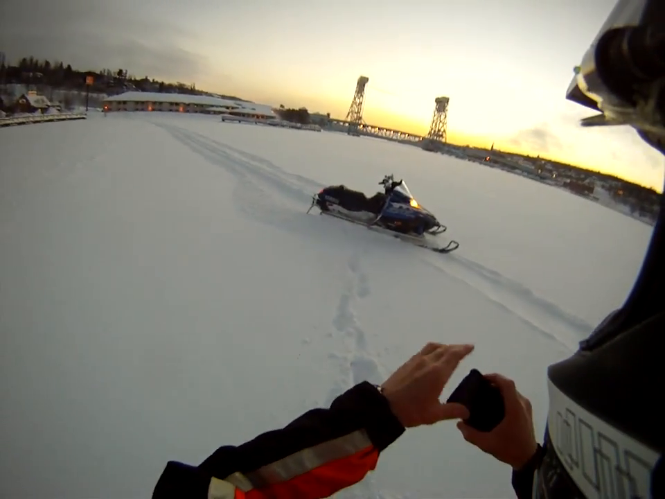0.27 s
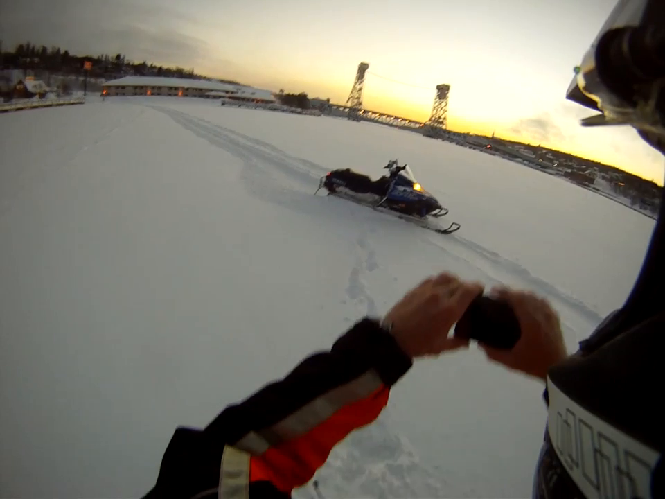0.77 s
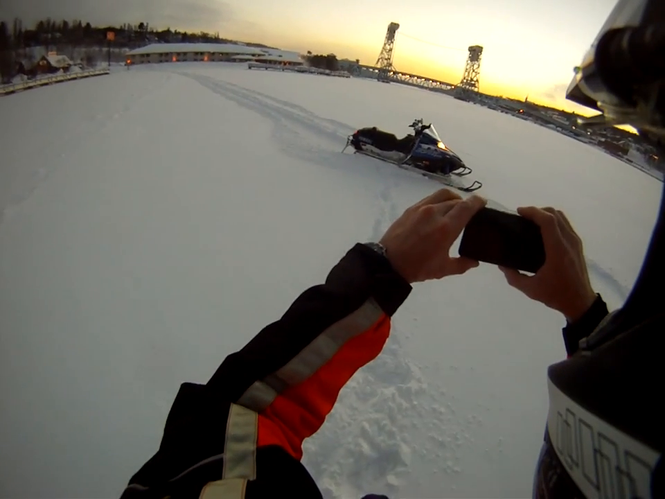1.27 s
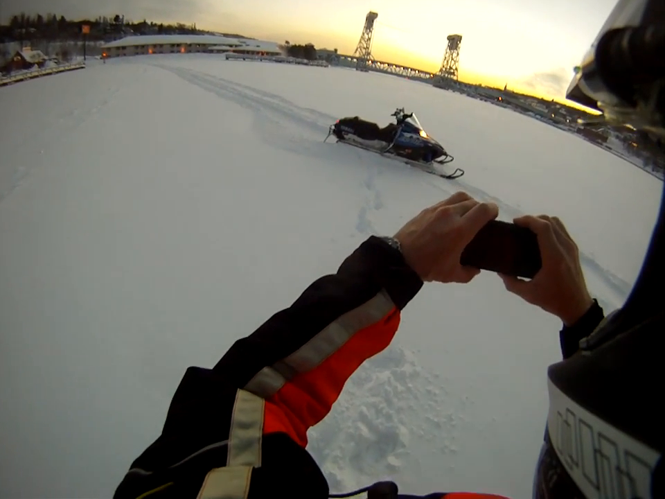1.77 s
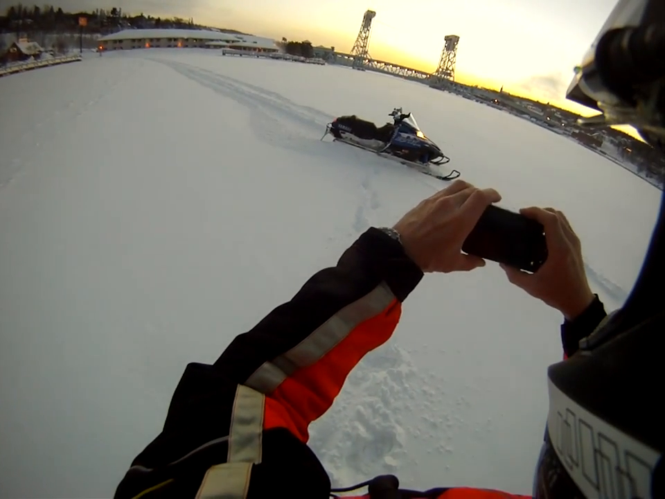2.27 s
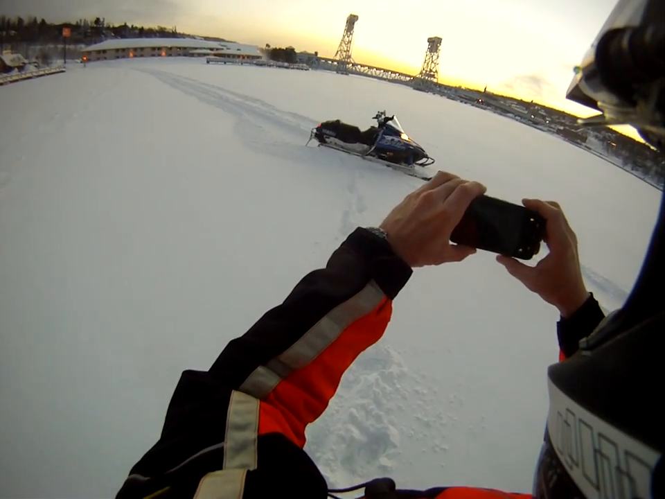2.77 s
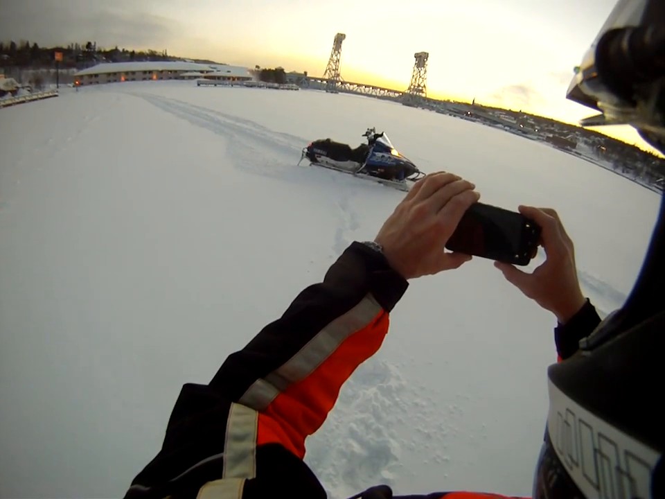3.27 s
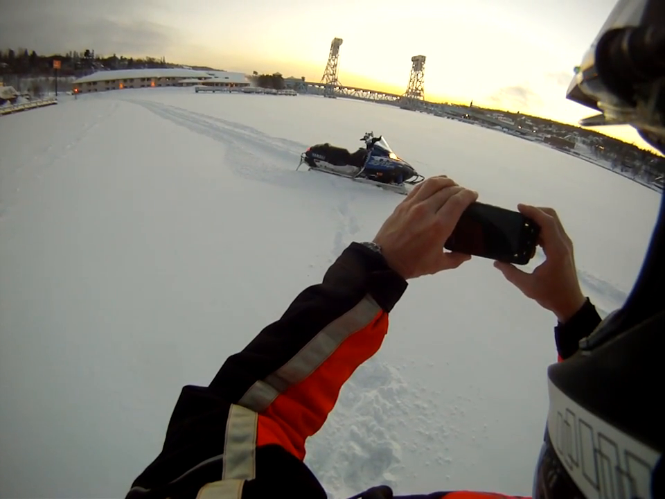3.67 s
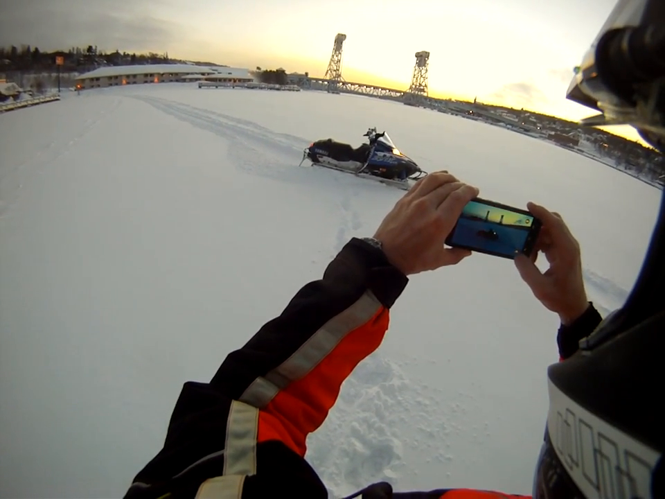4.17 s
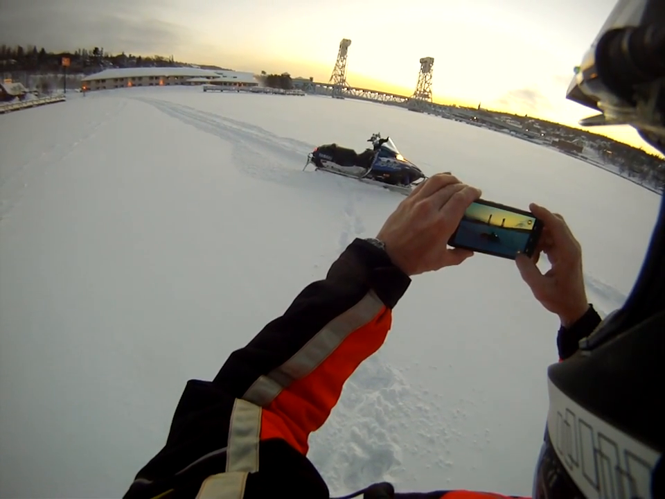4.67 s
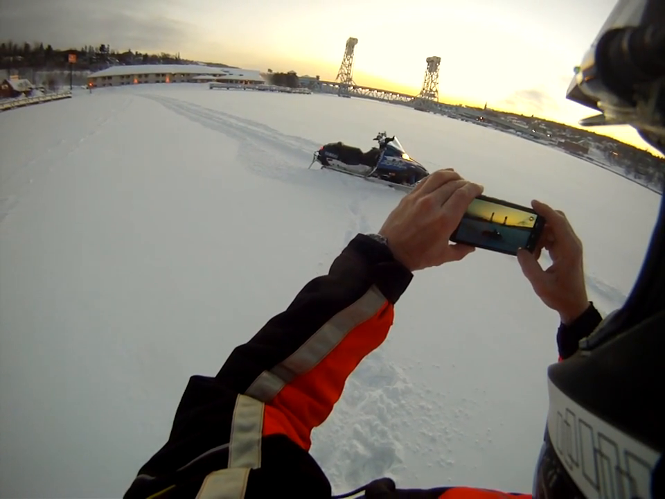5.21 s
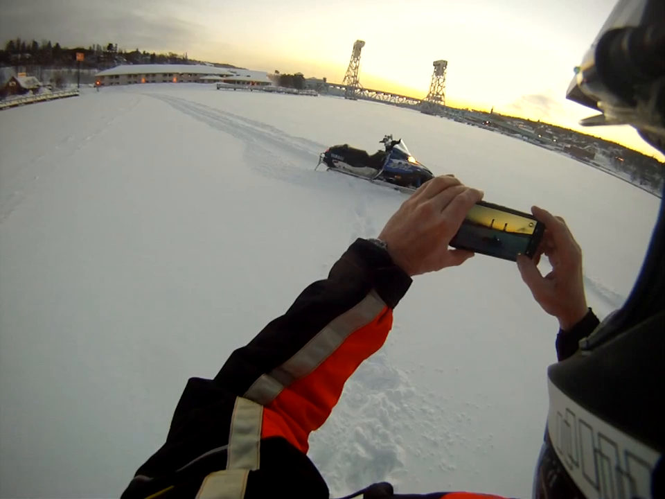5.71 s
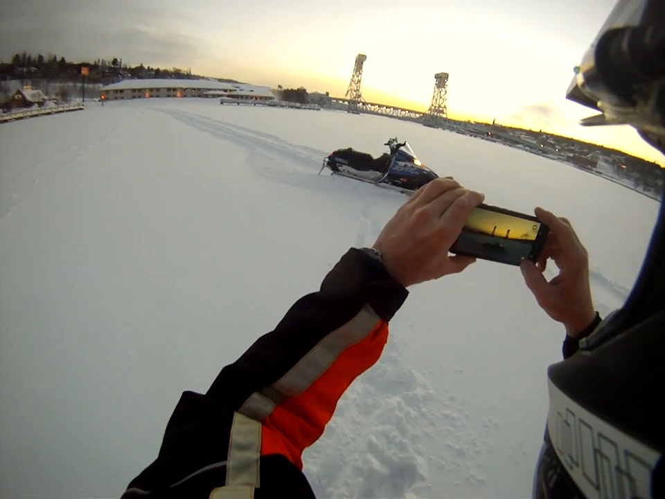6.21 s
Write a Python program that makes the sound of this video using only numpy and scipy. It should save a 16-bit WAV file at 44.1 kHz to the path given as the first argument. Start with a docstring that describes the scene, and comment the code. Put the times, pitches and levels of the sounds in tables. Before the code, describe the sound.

Muffled, uneven snowmobile idle heard from inside a sealed camera housing, with loud early clicks and knocks, soft low thumps, and one late sharp knock.

```python
"""A two-stroke snowmobile idles on open snow, heard by a camera sealed in a housing on a helmet.
Throughout, harmonics of the exhaust note lope over filtered-noise wash and clatter, with body rumble below.
In the first two seconds decaying modes make mount knocks and strap snaps, and grains of noise make cloth
rustle and creaks; knocks and rustle return near 6 s. Low thumps, damped sine pushes, recur all along.
The recorder holds each sample at a low rate, which mirrors the sound into the treble."""
import sys
import numpy as np
from scipy import signal
from scipy.fft import rfft, irfft
from scipy.io import wavfile

SR = 44100
rng = np.random.default_rng(int(sys.argv[2]) if len(sys.argv) > 2 else 0)


def wav_record(signal):
    """Record a signal, one row per channel, as 16-bit PCM in the file named by sys.argv[1]."""
    frames = np.transpose(np.atleast_2d(signal))
    bounded = np.clip(frames, -1, 1)
    # unit amplitude maps onto the largest positive 16-bit level
    quanta = np.round(bounded * 32767).astype(np.int16)
    wavfile.write(sys.argv[1], SR, quanta)


N = 284441
T = np.arange(N) / SR

# Modes of the mount's shell. Each row: frequency in Hz, relative level in dB, t60 in seconds.
SHELL = [(331, -10.5, 0.015), (850, -16.5, 0.036), (1292, 2.5, 0.018), (1770, 2, 0.013), (1890, -1, .015),
         (2230, -8, 0.011), (2550, -8.5, 0.012), (3377, -17, 0.016), (4340, -46.5, 0.018),
         (5210, -22, 0.0083)]


def gain_of(db):
    """A level in decibels is twenty times the logarithm of an amplitude ratio."""
    return 10 ** (np.asarray(db) / 20)


def evened(x):
    """Dividing by the root mean square gives a signal unit rms."""
    return x / np.sqrt(np.mean(x ** 2) + 1e-20)


def read(points, hz):
    """A spectrum is interpolated in level along a logarithmic frequency axis."""
    f, value = np.transpose(points)
    return np.interp(np.log(hz + 1), np.log(f + 1), value)


def add(mix, s, sound):
    """Superposition: a sound starting at second s is summed into the mix in place."""
    part = mix[round(s * SR):][:len(sound)]
    part += sound[:len(part)]


def coloured(x, db_of):
    """Linear filtering multiplies the spectrum by a gain, given in dB as a function of frequency."""
    frequencies = np.fft.rfftfreq(N, 1 / SR)
    return irfft(rfft(x) * gain_of(db_of(frequencies)), N)


def wander(hz):
    """Low-passed white noise is a slow random fluctuation, here of unit rms and up to about hz."""
    return evened(coloured(rng.standard_normal(N), lambda f: -10 * np.log10(1 + (f / hz) ** 6)))


def engine():
    """Periodic firing gives harmonic orders; the same unsteady cycle modulates broadband wash and clatter."""
    # The exhaust note, second multiple of the firing rate.
    # Each row: time in seconds, frequency in Hz before the lope, reference level of the orders in dB.
    exhaust = [(0.0, 143.6, -45), (0.09, 142.0, -45), (0.99, 138.9, -46), (1.11, 136.5, -46),
               (1.47, 136.8, -46), (1.56, 140.3, -48), (1.63, 136.6, -46), (1.92, 136.7, -46),
               (2.01, 139.1, -46), (2.44, 136.7, -46), (2.86, 138.9, -46), (3.34, 134.4, -46),
               (4.4, 137.4, -47), (5.17, 134.2, -47), (5.59, 136.9, -46), (6.02, 134.4, -47),
               (6.45, 135.5, -45)]
    # Orders of the exhaust note; one crank turn is a sixth of the note.
    # Each row: multiple of the note, mean level in dB against the reference.
    orders = [(1 / 2, -17), (4 / 6, -32.5), (3 / 4, -23), (5 / 6, -24.5), (1, -0.5), (7 / 6, -19),
              (5 / 4, -24.5), (8 / 6, -29.5), (3 / 2, -26), (2, -33)]
    # Engine wash and self noise. Each row: frequency in Hz, relative level in dB per Hz.
    roar = [(56, -30), (85, -10), (137, -5), (175, -9.5), (230, -16.5), (400, -16), (520, -21.5),
            (1000, -23.5), (2000, -23.5), (3500, -27.5), (6500, -30.5)]
    roar_db, clatter_db = -59, -66  # rms levels

    s, hz, db = np.transpose(exhaust)
    lope_hz = 7.5 + 2.516 * wander(hz=2.48)
    lope = np.cos(2 * np.pi * np.cumsum(lope_hz) / SR)
    note_hz = np.interp(T, s, hz) + 4.5 * lope + 1.5 * wander(hz=18)
    turns = np.cumsum(note_hz) / SR  # cycles of the exhaust note

    tone = np.zeros(N)
    for multiple, order_db in orders:
        if multiple == 1:
            spread_db = .3
        elif multiple == 1 / 2:
            spread_db = 1.2
        else:
            spread_db = 3
        order_gain = gain_of(order_db + spread_db * wander(hz=9))
        phase = 2 * np.pi * (multiple * turns + rng.random())
        tone += order_gain * np.sqrt(2) * np.cos(phase)
    tone *= gain_of(np.interp(T, s, db))

    firing = np.cos(np.pi * turns)
    crank = np.cos(np.pi * turns / 3)
    strength = 0.94 * lope + 1.1 * wander(hz=10) + 0.8 * firing + 1.26 * crank
    wash_source = rng.standard_normal(N) * gain_of(0.29 * strength)
    wash = evened(coloured(wash_source, lambda f: read(roar, f)))
    clatter_source = rng.standard_normal(N) * gain_of(0.99 * strength)
    clatter = evened(housing(housing(clatter_source)))  # two passes sharpen the resonances
    return tone + gain_of(roar_db) * wash + gain_of(clatter_db) * clatter


def housing(x):
    """Resonance: the sealed air and plastic respond as a bank of parallel band-pass filters."""
    # Each row: resonance in Hz, width in Hz, peak gain in dB for one pass.
    resonances = [(828, 120, -7.5), (1314, 97, -6), (1454, 92, 2.5), (1543, 91, -2.5), (1680, 110, -1),
                  (1950, 77, -16.5)]
    out = 0
    for hz, width, db in resonances:
        b, a = signal.iirpeak(hz, hz / width, SR)
        out = out + gain_of(db) * signal.lfilter(b, a, x)
    return out


def knocks():
    """Impulsive excitation: knocks ring the shell and snaps ring the strap, carried through the mount."""
    # Mount knocks. Each row: start in seconds, peak in dB, brightness in dB at 2200 Hz.
    knock_rows = [(0.1214, -12.5, 0), (0.8359, -8.5, 3), (1.151, -32.5, -17), (1.375, -36.5, -14),
                  (1.7024, -26, -12.5), (5.939, -36, -9), (6.0229, -10, 3)]
    # Strap snaps. Each row: start in seconds, peak in dB, brightness in dB at 2200 Hz.
    snap_rows = [(.0484, -12, -5), (.1415, -24, -3), (0.1545, -40, -9), (.1565, -5.5, -0.5),
                 (0.248, -44, -16), (0.318, -42.5, -12), (.364, -36, -9), (0.3706, -25, -8.5),
                 (.385, -30, -12.5), (0.4284, -32, -20), (0.431, -30, -13), (0.4352, -31.5, -20),
                 (.615, -39, -15), (0.928, -39.5, -13)]
    # Modes of the strap. Each row: frequency in Hz, relative level in dB, t60 in seconds.
    strap = [(540, -12, 0.016), (953, -23, 0.025), (1182, -10.5, 0.022), (1400, -2.5, 0.014),
             (1547, 3, 0.01), (1800, -4, 0.015), (2120, -11, 0.02), (2880, -0.5, 0.0084), (3117, 3, 0.0077),
             (3420, 2, 0.0083), (3900, -18, 0.016), (4720, -12, 0.007), (5090, -15.5, 0.0078)]
    out = np.zeros(N)
    for s, db, bright_db in knock_rows:
        add(out, s, gain_of(db) * ring(SHELL, bright_db, cycles=1.46))
    for s, db, bright_db in snap_rows:
        add(out, s, gain_of(db) * ring(strap, bright_db, cycles=1.4))
    return out


def ring(modes, bright_db, cycles):
    """Modal decay: each mode builds up over some of its own cycles, so treble comes first; peak 1."""
    t = np.arange(SR // 10) / SR
    out = np.zeros(len(t))
    for hz, db, t60 in modes:
        build = 1 - np.exp(-(t * hz / cycles) ** 2)
        colour_db = bright_db * np.log2(1 + (hz / 2200) ** 2)  # negative brightness removes treble
        decay = gain_of(db + colour_db - 60 * t / t60)
        out -= build * decay * np.sin(2 * np.pi * hz * t)
    return out / abs(out).max()


def rustle():
    """Friction: clumped grains of noise excite the housing (cloth) and the shell modes (mount creak)."""
    grains = rng.standard_normal((2, N)) * gain_of(3.0 * wander(hz=29.8))
    cloth_gain, creak_gain = strokes()
    b, a = signal.butter(2, [1000, 2400], "band", fs=SR)
    scrape = signal.lfilter(b, a, grains[0])
    cloth = evened(housing(scrape) + gain_of(-34) * grains[0])
    shell_ring = ring(SHELL, bright_db=-15.0, cycles=1.5)
    creak = evened(signal.oaconvolve(grains[1], shell_ring)[:N])
    return cloth * cloth_gain + creak * creak_gain


def strokes():
    """Amplitude envelopes of cloth and creak: one arch per stroke, rising quicker than it falls."""
    # Cloth drags over the housing and the mount creaks in its seat.
    # Each row: start in seconds, length in seconds, cloth and creak levels in dB at the top of the arch.
    stroke_rows = [(0.0, .06, -56, -68), (.13, .1, -48, -63), (.3, .05, -58, -72), (.35, .055, -50, -64),
                   (.36, .72, -58, -66), (.42, .07, -57, -60), (.505, .05, -57, -66), (.6, .13, -52, -63),
                   (.73, .17, -55, -62), (.9, .07, -58, -61), (.97, .07, -55, -62), (1.12, .08, -58, -74),
                   (1.24, .09, -60, -53), (1.41, .055, -54, -54), (1.505, .04, -63, -70),
                   (1.59, .08, -60, -65), (1.69, .1, -64, -66), (1.8, .12, -66, -74), (5.9, .2, -60, -76),
                   (6.12, .11, -56, -72), (6.4, .1, -58, -76)]
    peak_at, sharpness = .4, 1.2  # share of the length; power of the arch
    warp = np.log(.5) / np.log(peak_at)  # brings the top of the sine arch to peak_at
    gains = np.zeros((2, N))
    for s, length, cloth_db, creak_db in stroke_rows:
        u = np.arange(0, 1, 1 / (length * SR))
        arch = np.sin(np.pi * u ** warp) ** sharpness
        add(gains[0], s, gain_of(cloth_db) * arch)
        add(gains[1], s, gain_of(creak_db) * arch)
    return gains


def thumps():
    """Heavily damped oscillation: low thumps through the body and dull bumps on the helmet."""
    # Low thumps. Each row: start in seconds, envelope peak in dB.
    thump_rows = [(.029, -44), (.58, -48), (.736, -49), (1.005, -42), (1.195, -51), (1.707, -44),
                  (2.136, -46), (2.612, -50), (3.084, -49), (3.549, -52), (4.012, -48), (5.577, -56),
                  (5.844, -45), (6.201, -44)]
    # Bumps on the helmet. Each row: start in seconds, envelope peak in dB, frequency in Hz, cycles to the peak.
    thud_rows = [(.136, -33, 53, .9), (.43, -34, 195, 1.0), (.441, -39, 171, 1.2), (.613, -51, 480, 2.1)]
    out = np.zeros(N)
    for s, db in thump_rows:
        add(out, s, push(db, hz=43.0, cycles=1.05))
    for s, db, hz, cycles in thud_rows:
        add(out, s, push(db, hz, cycles))
    return out


def push(db, hz, cycles):
    """A critically damped envelope lets a sine swell and die within a few cycles."""
    t = np.arange(SR // 3) / SR
    u = t * hz / cycles
    envelope = u ** 2 * np.exp(2 - 2 * u)  # reaches 1 at u = 1
    return gain_of(db) * envelope * np.sin(2 * np.pi * hz * t)


def rumble():
    """Structure-borne sound: low-frequency noise of the wearer's body under a slowly varying level."""
    # Each row: frequency in Hz, relative level in dB per Hz.
    rumble_spectrum = [(20, -24), (30, -11), (41, -0.5), (52, -2), (62, -22), (90, -60)]
    # Stronger while the wearer moves. Each row: time in seconds, rms level in dB.
    rumble_level = [(0, -54), (.2, -51), (.6, -56), (.7, -63), (1.7, -63), (1.9, -57), (2.25, -63),
                    (5.6, -64), (6.45, -61)]
    s, db = np.transpose(rumble_level)
    noise = coloured(rng.standard_normal(N), lambda f: read(rumble_spectrum, f))
    return evened(noise) * gain_of(np.interp(T, s, db))


def scene():
    """Superposition: the pressures of all sources add at the one microphone."""
    mono = engine() + knocks() + rustle() + thumps() + rumble()
    return np.array([mono, mono])


def record(dry):
    """Sample and hold: slow sampling mirrors the spectrum around the hold rate, under a sinc slope."""
    # Colour of the left-right difference. Each row: frequency in Hz, relative level in dB.
    side_spectrum = [(60, -82), (160, -60), (230, -22), (550, -14), (1650, -20.5), (4970, -16),
                     (15000, -43.5)]
    hold_hz, edge_hz = 12000, 15300  # sampling rate of the hold; final low-pass edge
    anti_alias = signal.firwin(61, 5650, window=("kaiser", 4), fs=SR)
    narrow = signal.oaconvolve(dry[0], anti_alias, "same")
    mirrored = narrow * (1 + 2 * np.cos(2 * np.pi * hold_hz * T))
    held = coloured(mirrored, lambda f: 20 * np.log10(abs(np.sinc(f / hold_hz)) + 1e-6))
    # a faint flicker, opposite in left and right, follows the sound
    flicker = held * rng.standard_normal(N)
    side = coloured(flicker, lambda f: read(side_spectrum, f)) * gain_of(-11.5)
    both = np.array([held + side, held - side])
    low_pass = signal.firwin(1001, edge_hz, window=("kaiser", 9), fs=SR)
    return signal.oaconvolve(both, low_pass[None], "same")


dry = scene()
out = record(dry)
wav_record(out)
```